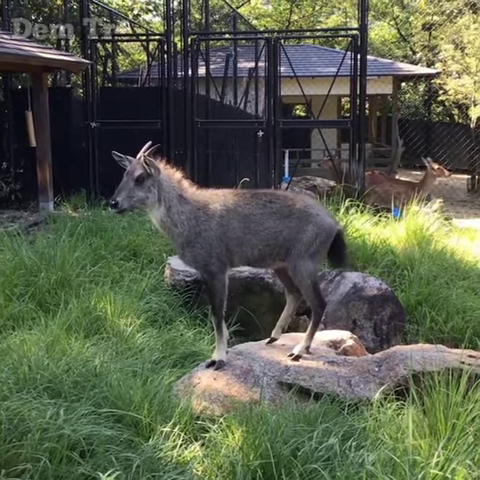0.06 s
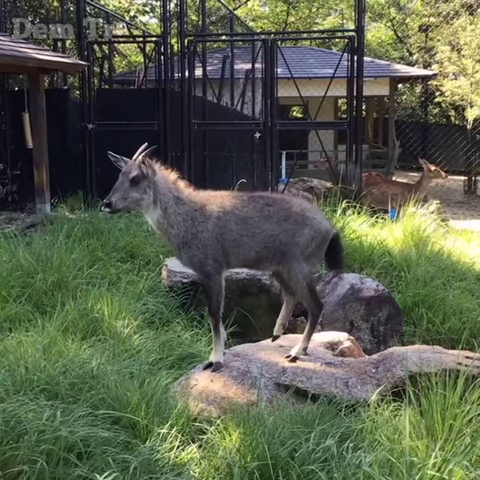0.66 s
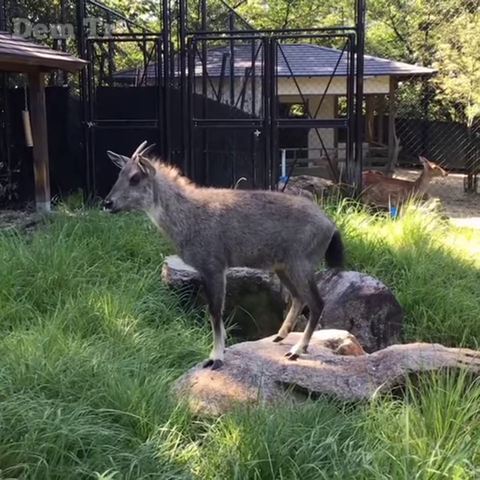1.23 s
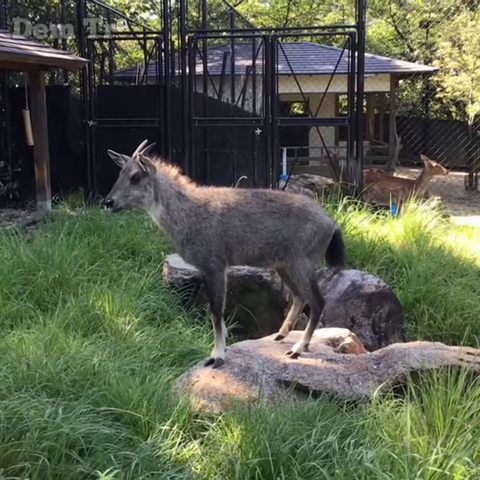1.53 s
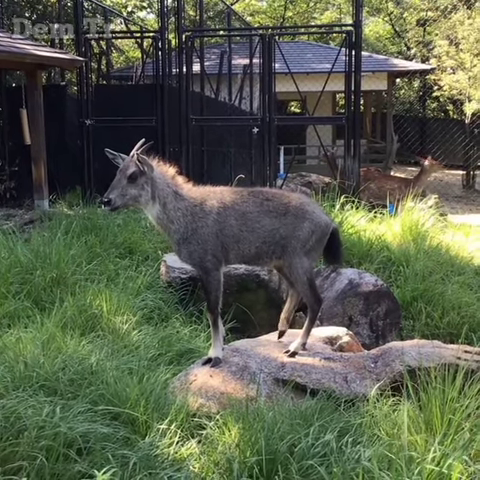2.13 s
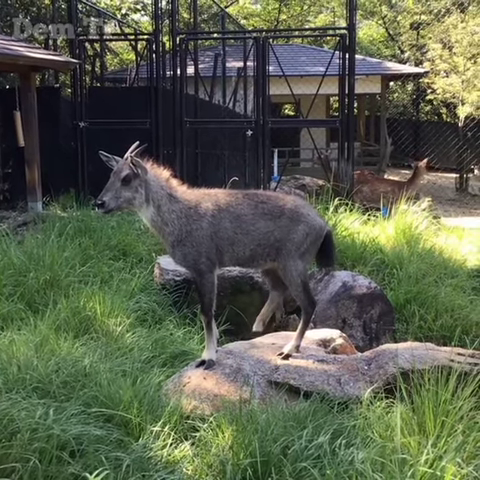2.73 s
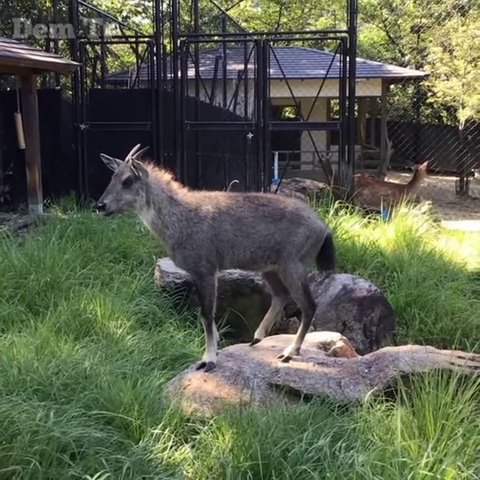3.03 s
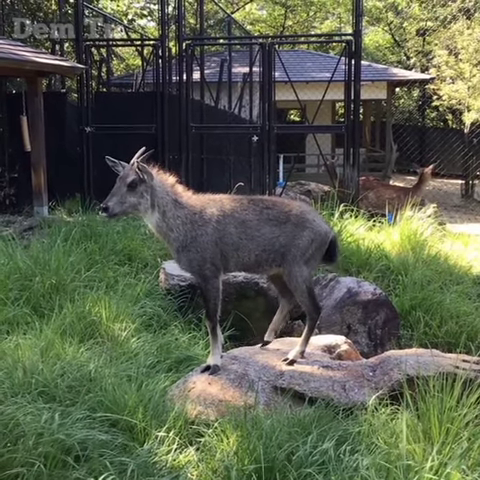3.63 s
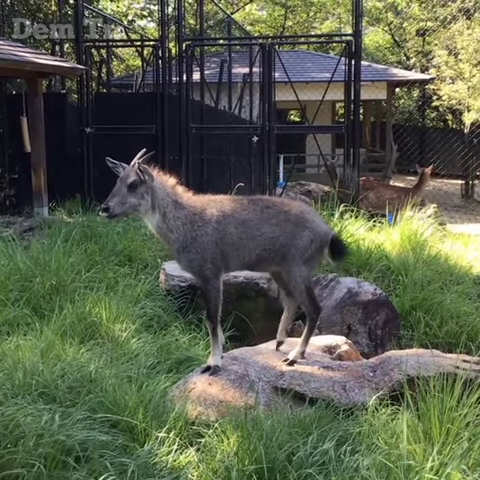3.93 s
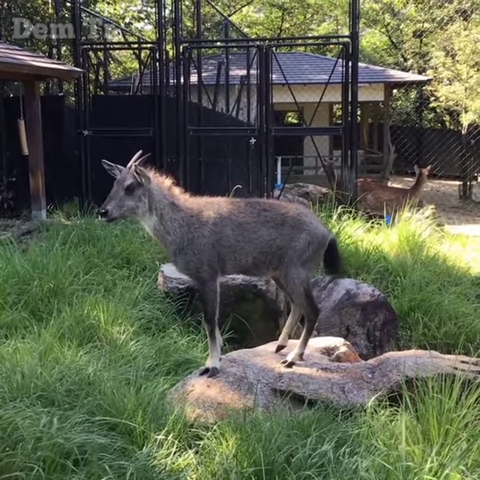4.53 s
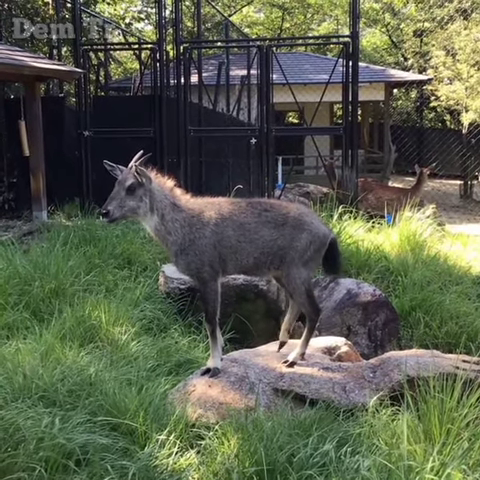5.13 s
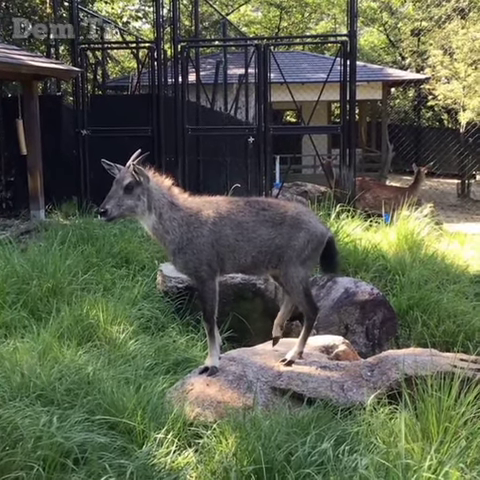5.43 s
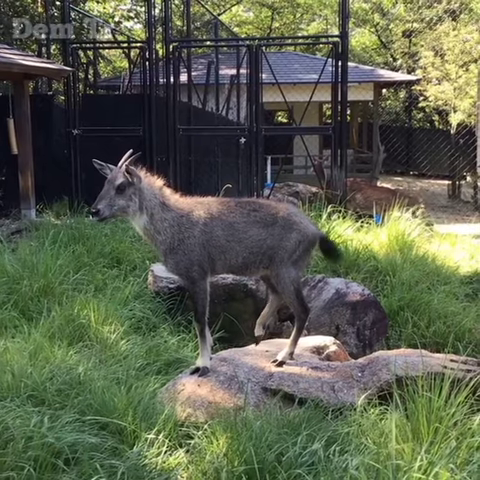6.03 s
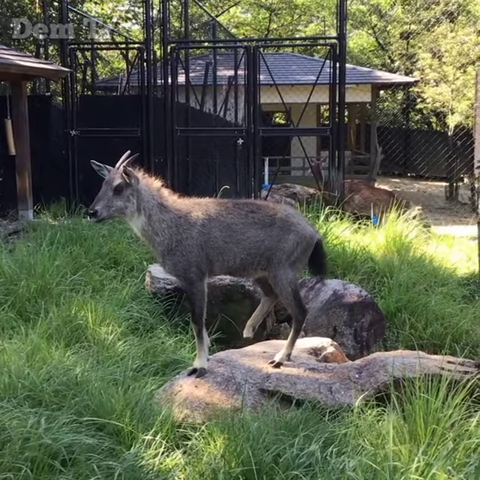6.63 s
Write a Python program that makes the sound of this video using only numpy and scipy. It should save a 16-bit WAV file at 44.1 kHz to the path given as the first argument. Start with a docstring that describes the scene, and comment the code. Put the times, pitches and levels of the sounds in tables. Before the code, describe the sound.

Two sharp, breathy nasal snorts from a hoofed animal cut through a constant sprayer-like hiss and faint distant rumble.

```python
"""Two sharp alarm snorts from a goat-antelope on a rock in a grassy enclosure, a few metres away.
Each is a turbulent jet of air that rings the nasal passages and echoes faintly off walls and sheds.
Behind them a steady high hiss, like a water sprayer, a low distant rumble and two soft bumps,
all heard through one microphone."""
import sys
import numpy as np
from scipy import signal
from scipy.fft import rfft, irfft
from scipy.io import wavfile

SR = 44100
rng = np.random.default_rng(int(sys.argv[2]) if len(sys.argv) > 2 else 0)


def unload_wav(signal):
    """Save mono or channel-first audio to the path in sys.argv[1] as 16-bit WAV at rate SR, clipped to [-1, 1]."""
    wavfile.write(
        sys.argv[1],
        SR,
        np.round(np.clip(np.atleast_2d(signal).T, -1, 1) * 32767).astype(np.int16),
    )


N = 303065
TIME = np.arange(N) / SR
FREQS = np.maximum(np.fft.rfftfreq(N, 1 / SR), 1)


def undb(db):
    """Decibels to gain."""
    return 10 ** (np.asarray(db) / 20)


def colour(points):
    """Gain at every frequency from (freq_hz, level_db) points."""
    hz, db = np.transpose(points)
    return undb(np.interp(np.log(FREQS), np.log(hz), db))


def resonances(modes):
    """Gain of a set of steep-sided resonances whose powers add."""
    power = sum(undb(db) ** 2 / (1 + ((FREQS - hz) / (0.54 * width)) ** 2) ** 2
                for hz, width, db in modes)
    return np.sqrt(power)


def noise(gain):
    """Noise of rms 1, shaped by a gain at every frequency."""
    shaped = irfft(rfft(rng.standard_normal(N)) * gain, N)
    return shaped / np.sqrt(np.mean(shaped ** 2))


def wander(rate_hz):
    """Random wandering of spread 1, up to about rate_hz."""
    return noise(1 / (1 + (FREQS / rate_hz) ** 4))


def split(sound, hz):
    """The parts of a sound below and above a frequency."""
    low = irfft(rfft(sound) / (1 + (FREQS / hz) ** 4), N)
    return low, sound - low


# Rumble reaching the enclosure from far off: freq_hz, level_db
RUMBLE_SPECTRUM = [(20, -10.5), (35, -41), (50, -7), (65, 2.5), (80, -0.5), (110, -1.5), (170, -4),
                   (260, -9), (400, -12.5), (600, -15), (850, -20), (1500, -25.5), (3000, -33)]

def distant_rumble(rumble_db=-56, swell_db=0.9, drone_hz=79, drone_db=-66):
    """Far-off rumble that swells and sinks, with a vague low drone in it."""
    rumble = noise(colour(RUMBLE_SPECTRUM)) * undb(rumble_db + swell_db * wander(13))
    drone = undb(drone_db) * noise(resonances([(drone_hz, 6, 0)]))
    return rumble + drone


# Soft bumps in the background: centre_s, pitch_hz, half_width_s, peak_db
SOFT_BUMPS = [(3.281, 90, 0.011, -37), (3.92, 114, .01, -48)]

def bumps():
    """Dull knocks, each only two or three cycles long."""
    knocks = np.zeros(N)
    for centre_s, pitch_hz, half_width_s, peak_db in SOFT_BUMPS:
        envelope = undb(peak_db) * np.exp(-((TIME - centre_s) / half_width_s) ** 2)
        knocks += envelope * np.cos(2 * np.pi * pitch_hz * (TIME - centre_s))
    return knocks


# Broad hiss of the spray, behind the animal: freq_hz, level_db
SPRAY_SPECTRUM = [(1000, -25.5), (1650, -21.5), (2050, -13), (2450, -5), (3150, 0.5), (4000, -0.5),
                  (5000, 0), (5650, -6), (7000, -6.5), (7700, 0), (8400, 0.5), (9400, -5), (11400, -24),
                  (13800, -23.5)]
# The spray's reflections off nearby surfaces: delay_s, level_db
SPRAY_REFLECTIONS = [(.00188, -20), (.002664, -23), (.007766, -13.5)]
# Slow drift of the hiss's treble: time_s, level_db
TREBLE_DRIFT = [(0, 0.5), (1.5, -0.5), (2.7, -0.9), (3.4, 0.5), (4.3, 0.2), (5.4, 0), (6.8, 0.2)]
# Narrow whistling resonances of the nozzle: pitch_hz, width_hz, level_db
NOZZLE_MODES = [(2452, 100, -6.5), (3052, 15.6, 4), (3290, 20, -16), (3310, 30, -0.5), (3741, 53, 3.5),
                (4220, 25, 0), (4810, 31, 1), (4820, 45, -8), (5320, 106, -4.5), (6080, 37, -4.5),
                (6510, 120, -6.5)]

def sprayer(hiss_db=-44.5, whistle_db=-52, waver_db=1.5, sputter_db=0.47, shimmer_db=0.86):
    """Steady spray that sputters slightly, with faint wavering whistles from the nozzle."""
    # reflections comb the hiss and give it a hollow ring
    comb = 1 + sum(undb(db) * np.exp(-2j * np.pi * FREQS * delay_s) for delay_s, db in SPRAY_REFLECTIONS)
    treble = noise(colour(SPRAY_SPECTRUM) * comb)
    hiss = np.zeros(N)
    # coarse and fine droplets come and go separately
    for edge_hz in (3500, 5500):
        band, treble = split(treble, edge_hz)
        hiss += band * undb(shimmer_db * wander(25))
    hiss += treble * undb(np.interp(TIME, *np.transpose(TREBLE_DRIFT)))
    whistle = noise(resonances(NOZZLE_MODES)) * undb(whistle_db + waver_db * wander(17))
    return hiss * undb(hiss_db + sputter_db * wander(45)) + whistle


# First echoes off the walls, back to the microphone: delay_s, level_db
WALL_ECHOES = [(0.022, -28), (0.055, -25), (.092, -28.5)]

def enclosure_echoes(sound, scatter_db=-19.0, dull_hz=4000, thin_hz=1050, t60_s=0.76, build_s=0.0095):
    """Wall echoes, then thin scatter from rocks, sheds and trees; the grass swallows the lows."""
    envelope = np.exp(-np.log(1000) * TIME / t60_s) * (1 - np.exp(-TIME / build_s))
    tail = rng.standard_normal(N) * envelope
    response = undb(scatter_db) * tail / np.sqrt(np.sum(tail ** 2))
    for delay_s, level_db in WALL_ECHOES:
        response[int(delay_s * SR)] += undb(level_db)
    echoes = signal.fftconvolve(sound, response)[:N]
    dulled = split(echoes, dull_hz)[0]
    return split(dulled, thin_hz)[1]


def nostril_whistle(centre_s=0.553, pitch_hz=1040, width_hz=45, half_width_s=0.0085, level_db=-34):
    """The nostrils whistle briefly as they close at the end of the first snort."""
    envelope = undb(level_db) * np.exp(-((TIME - centre_s) / half_width_s) ** 2)
    return envelope * noise(resonances([(pitch_hz, width_hz, 0)]))


ATTACK_S, RELEASE_S = 0.046, 0.021

def breath_pressure(age_s, hold_s, creep_db=1.8, attack_curve=1.11, steepness=2.65):
    """Air pressure in dB against its crest: it builds, creeps up while held, then collapses."""
    attack = np.clip(age_s / ATTACK_S, 1e-6, 1) ** attack_curve
    held = np.clip((age_s - ATTACK_S) / hold_s, 0, 1)
    release = 1 / (1 + (np.maximum(age_s - ATTACK_S - hold_s, 0) / RELEASE_S) ** steepness)
    return 20 * np.log10(attack * release) - creep_db * (1 - held)


# Broad hiss of the jet at the nostrils: freq_hz, level_db
JET_SPECTRUM = [(100, -30), (270, -37), (740, -28), (1000, -9), (2200, -2), (3000, -7), (5000, -11),
                (6500, -14), (8500, -14.5), (10000, -17), (12000, -21.5), (14000, -19)]

def snort(nasal_modes, start_s, hold_s, level_db, lows_db, jet_db, flutter_db,
          opening_db_per_s=33, edge_db=-1.25, dulling_db_per_s=58, sizzle_growth=0.17):
    """A blast of air through the nose: thin at first, deeper as the nostrils flare, dull as it slows."""
    age_s = TIME - start_s
    pressure_db = breath_pressure(age_s, hold_s)
    past_crest_s = np.clip(age_s - ATTACK_S - hold_s, -ATTACK_S - hold_s, 2 * RELEASE_S)
    air = noise(resonances(nasal_modes) + undb(jet_db) * colour(JET_SPECTRUM))
    low, high = split(air, hz=2400)
    deep, middle = split(low, hz=1250)
    bright, sizzle = split(high, hz=5500)
    # the finest eddies form only at full pressure
    treble = bright + undb(sizzle_growth * pressure_db) * sizzle
    # flaring nostrils let the lows out; the jet loses its edge as it widens
    opening = undb(lows_db + opening_db_per_s * past_crest_s)
    edge = undb(edge_db - dulling_db_per_s * past_crest_s)
    blast = opening * deep + middle + edge * treble
    # the soft nostril walls flap irregularly in the stream
    return blast * undb(level_db + pressure_db + flutter_db * wander(170))


# Resonances of the nasal passages in each snort: pitch_hz, width_hz, level_db
FIRST_NASAL_MODES = [(390, 200, -7.5), (590, 76, -3.5), (960, 140, 0), (1154, 67, -2), (1470, 99, 5.5),
                     (1640, 75, -1), (2015, 70, 2), (2260, 79, 0), (2630, 140, -2), (3080, 210, -10),
                     (3660, 140, -4), (4400, 250, -12.5), (4700, 180, -13), (5270, 140, -7.5)]
SECOND_NASAL_MODES = [(406, 130, -10.5), (556, 140, -6), (943, 110, 2.5), (1125, 50, 6), (1473, 140, 0),
                      (1630, 77, -4), (1980, 200, -2), (2257, 73, 3), (2760, 160, -10), (3245, 105, 2.5),
                      (3640, 69, -9), (4160, 92, -3), (4540, 100, -11), (4960, 100, -10)]
# Snorts from the rock, a few metres from the microphone:
# start_s, hold_s, level_db, lows_db (at the crest), jet_db (against the nasal ring), flutter_db
ALARM_SNORTS = [(0.437, 0.041, -23, 1, 0.5, 1), (3.781, .034, -22.5, 0, -1, -0.3)]

def goat_antelope():
    """The animal snorts twice in alarm, its nose ringing differently each time."""
    first = snort(FIRST_NASAL_MODES, *ALARM_SNORTS[0])
    second = snort(SECOND_NASAL_MODES, *ALARM_SNORTS[1])
    return first + second + nostril_whistle()


def scene():
    """The two snorts and their echoes over the steady background, in mono."""
    snorts = goat_antelope()
    return (snorts + enclosure_echoes(snorts) + sprayer() + distant_rumble() + bumps())[None]


def record(dry):
    """The recorder cuts the top steeply."""
    top_hz = 13800
    return signal.sosfilt(signal.ellip(12, 0.1, 90, top_hz, fs=SR, output="sos"), dry)


dry = scene()
out = record(dry)
unload_wav(out)
```